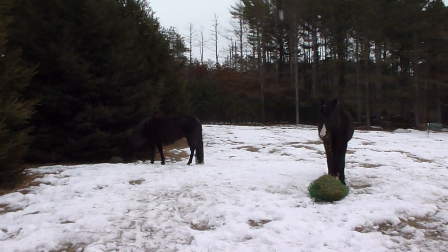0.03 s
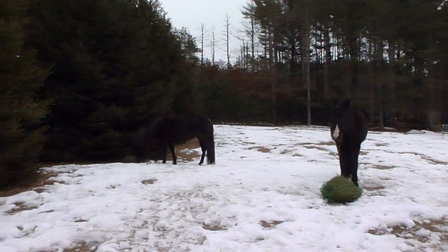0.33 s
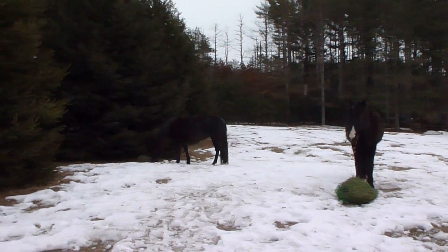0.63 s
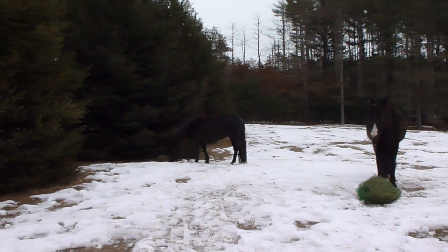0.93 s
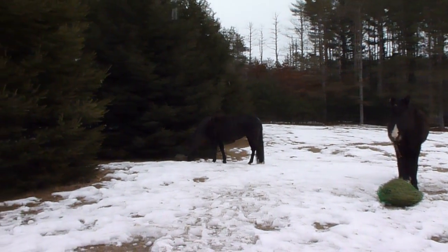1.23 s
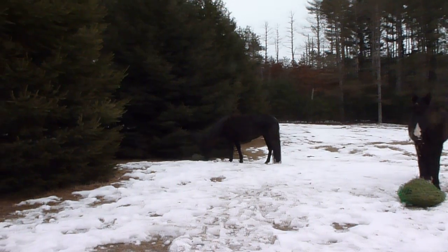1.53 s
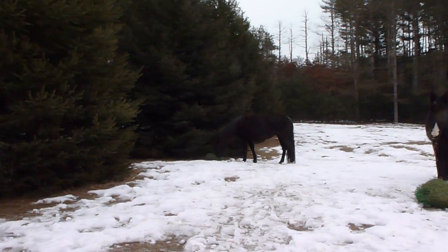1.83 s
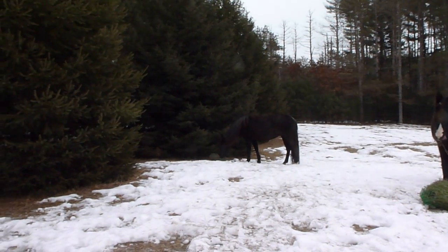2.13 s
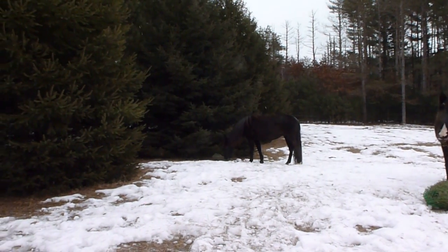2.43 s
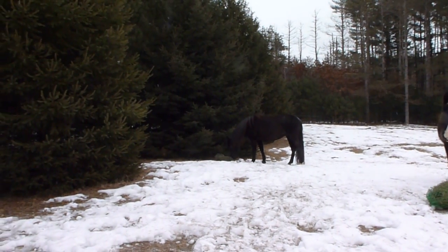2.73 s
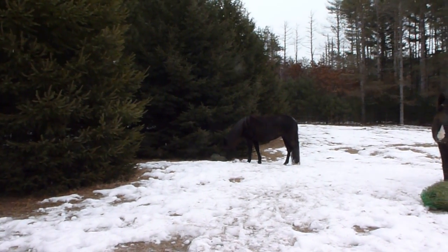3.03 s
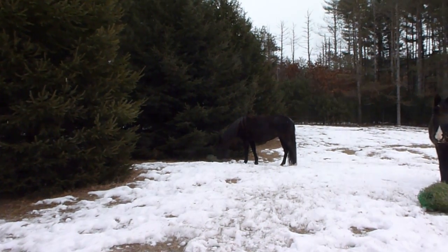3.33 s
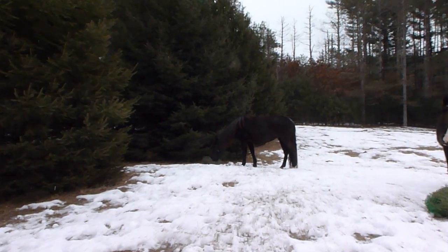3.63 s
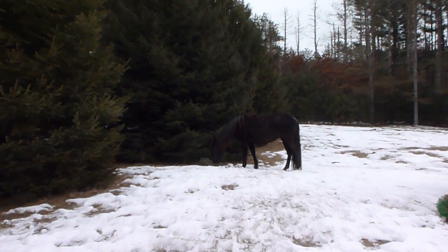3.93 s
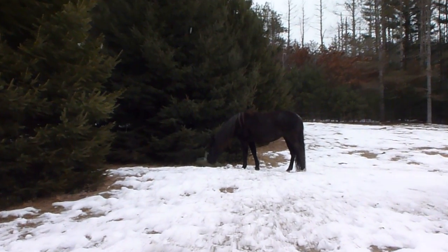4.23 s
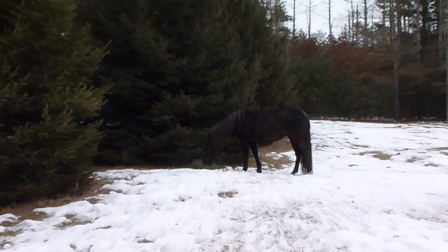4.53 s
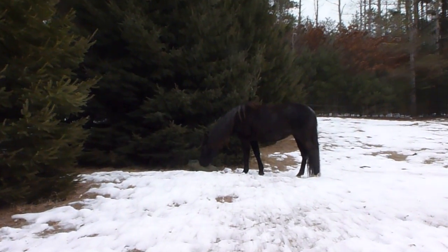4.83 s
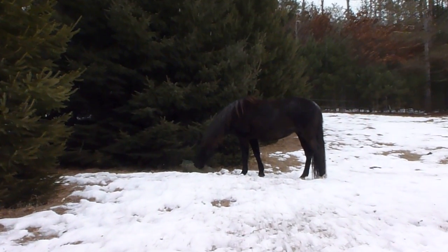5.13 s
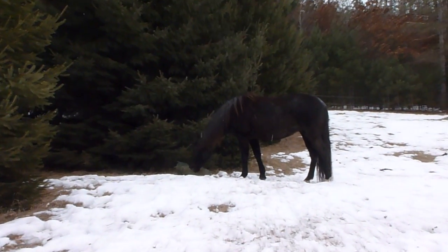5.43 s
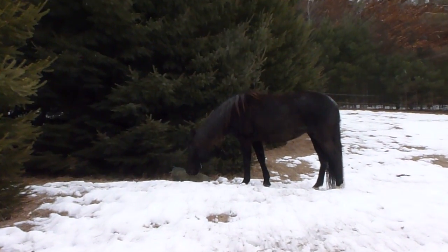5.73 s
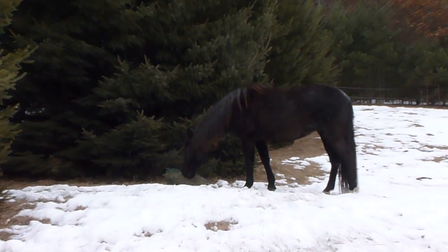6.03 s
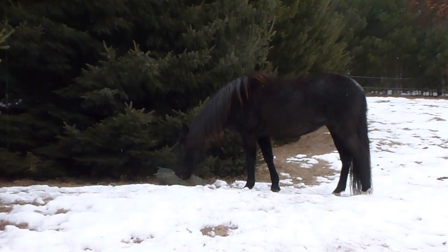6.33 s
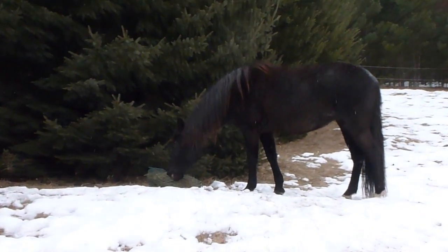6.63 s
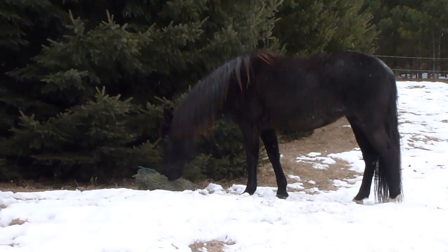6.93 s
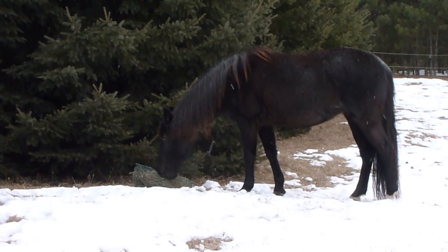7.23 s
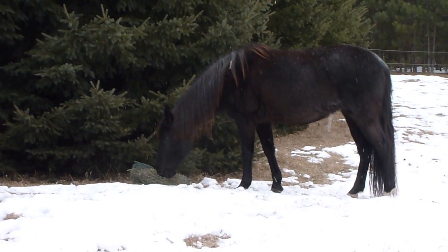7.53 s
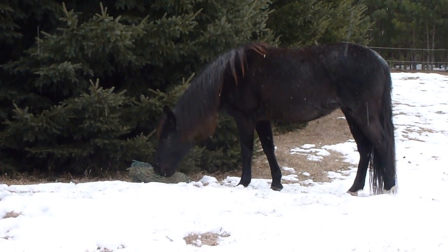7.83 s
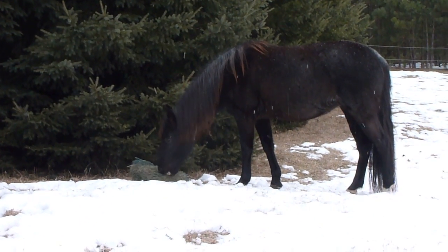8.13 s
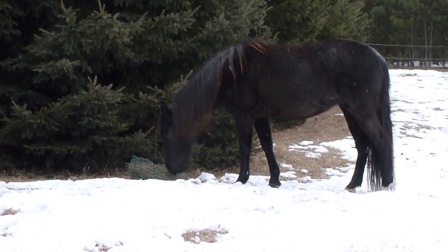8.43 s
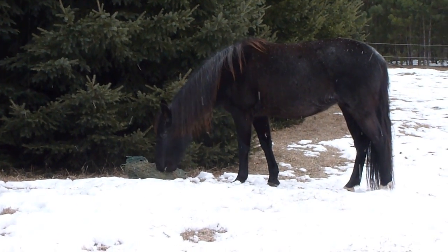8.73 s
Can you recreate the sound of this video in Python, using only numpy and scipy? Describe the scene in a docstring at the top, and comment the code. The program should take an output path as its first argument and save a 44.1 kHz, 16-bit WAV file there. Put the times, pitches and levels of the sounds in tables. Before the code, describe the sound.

Light rain falls on an open snowy field, a soft, steady hiss and fine patter over the low rumble of wind in distant trees. Single drops tick close to the microphone at irregular moments, dry and without echo. About three quarters of the way through, a big drop hits the microphone's plastic housing with a sharp knock. The background dips briefly and returns as more drops tick.

```python
"""Light rain on a snowy field

One microphone stands in open snow edged by conifers; soft wind and faint hums lie far off.
Countless distant drops merge into a hiss that swells with the breeze; nearer ones tick one by one.
A droplet, then a big drop, strike the microphone's housing, and the gain control ducks for a moment."""
import sys
import numpy as np
from scipy import signal
from scipy.fft import rfft, irfft
from scipy.io import wavfile
from scipy.ndimage import uniform_filter1d

SR = 44100
rng = np.random.default_rng(int(sys.argv[2]) if len(sys.argv) > 2 else 0)


def pcm_store(signal):
    """Save signal as 16-bit PCM."""
    levels = np.round(np.clip(np.atleast_2d(signal), -1, 1) * 32767)
    wavfile.write(sys.argv[1], SR, levels.astype(np.int16).T)


N = 392490

# Table levels are relative. Far-off hums: start t/s, end t/s, f/Hz, level/dB
HUMS = [(1.1, 3.6, 337.9, -58.5), (3.0, 4.9, 261, -60), (6.498, 8.003, 98, -57.5), (7.3, 9.4, 133.6, -59)]
# spectrum of the low roar of the far woods: f/Hz, level/dB
ROAR_SPECTRUM = [(20, -29), (40, -15.5), (62, -1), (100, 1), (160, 0), (220, 1.5), (300, -2.5),
                 (400, -17.5), (800, -39)]
# slow swell of that roar: t/s, level/dB
ROAR_SWELL = [(0, -50), (2.2, -49.5), (3.0, -51.3), (4.2, -51.5), (5.45, -47.5), (6.7, -50.5), (8.2, -50),
              (8.9, -51.5)]
# spectrum of the wind rushing in the conifers: f/Hz, level/dB
RUSH_SPECTRUM = [(100, -18), (280, 0), (340, 4), (380, 1), (800, -0.5), (1200, -6.5), (2000, -11.5),
                 (7000, -36)]
# strength of the breeze, which drives the rush, the rain and the drips: t/s, level/dB
BREEZE_LEVEL = [(0, 0), (0.5, 1.22), (2.4, 1.38), (2.7, -1.3), (3.4, 0), (6.5, -0.12), (7.8, -0.5),
                (8.4, 1.3), (8.9, 1.0)]
# spectrum of the distant rain's hiss: f/Hz, level/dB
HISS_SPECTRUM = [(300, -1), (1000, -2.5), (1700, 2), (2700, 6), (3800, 6), (5100, 3.5), (6300, -1),
                 (7000, -13), (8000, -12.5)]
# colour shared by all splashes: f/Hz, level/dB
SPLASH_SPECTRUM = [(80, -5.5), (350, 1), (700, 1.5), (1150, 1), (3600, -2), (5000, 0.5), (6300, -8.5),
                   (7500, -18.5)]
# loudest drops near the microphone: t/s, level/dB, centre f/Hz, spectral width/octaves
NEAR_DROPS = [(0.0553, -5.5, 3630, 2.9), (0.3264, 4, 3500, 0.15), (0.493, 2.5, 3530, 0.84),
              (0.714, -6.5, 5600, 0.22), (1.6896, 8, 2030, 0.29), (1.876, 1, 4270, 0.29),
              (1.8818, 7.5, 2150, 0.64), (2.007, -2, 2220, 0.45), (2.0405, -2, 3500, 0.28),
              (2.0683, -4, 1390, 1.6), (2.1412, -6.5, 1670, 1.05), (3.2209, -4.5, 1790, 0.71),
              (3.5675, -4.5, 3930, 0.32), (3.959, -5.5, 4480, 0.8), (4.0553, -5, 2150, 0.31),
              (4.197, -5, 1390, 0.59), (4.384, 3.5, 3700, 0.55), (5.042, -7, 2410, 1.1),
              (5.2394, 3, 3450, 0.11), (6.0237, -6.5, 1120, 1.9), (6.369, -4, 1950, 0.67),
              (6.4094, -8, 2320, 1.1), (7.019, -4, 3450, 0.43), (7.1412, -5, 1290, 2),
              (7.2671, 0.5, 2300, 0.96), (7.465, -3.5, 3300, 0.37), (7.5992, -4.5, 1000, 1.9),
              (7.9, 0, 1960, 1.16), (7.9706, 4.5, 1870, 1.34), (8.011, 0.5, 1330, 1.1),
              (8.272, 1, 1950, 0.92), (8.3328, -3, 3150, 0.43), (8.5237, -3, 1750, 1.2),
              (8.6221, -3, 2200, 0.45), (8.7736, -2, 2820, 1)]
# drops landing on the microphone's housing: t/s, level/dB
HOUSING_HITS = [(6.76, -22.5), (6.7821, -1.5)]
# modes of the housing: f/Hz, level/dB, t60/s
HOUSING_MODES = [(870, -11.5, 0.0028), (1420, -21.5, 0.046), (1720, -13.5, 0.034), (1986, -7, 0.015),
                 (2750, -9.5, 0.0068), (3720, -13.5, 0.018), (4780, -16.5, 0.0068), (5900, -16.5, 0.0082),
                 (6700, -15, 0.0046)]


def amp(db):
    """Decibels to gain."""
    return 10 ** (np.asarray(db) / 20)


def unit(x):
    """Scales to an rms of one."""
    return x / np.sqrt(np.mean(x ** 2) + 1e-20)


def spectrum_db(points, hz):
    """Reads a spectrum on a log-frequency axis."""
    f, db = np.transpose(points)
    return np.interp(np.log(hz + 1), np.log(f), db)


def follow(curve):
    """Gain at every sample from a level curve."""
    return amp(np.interp(np.arange(N) / SR, *np.transpose(curve)))


def add(mix, start_s, sound):
    """Mixes a sound in at a time."""
    part = mix[max(round(start_s * SR), 0):][:len(sound)]
    part += sound[:len(part)]


def minimum_phase(gain):
    """Shortest response with the given two-sided spectrum: a sharp attack, then a decay."""
    log_spectrum = np.conj(signal.hilbert(np.log(gain)))
    return np.fft.ifft(np.exp(log_spectrum)).real[:len(gain) // 2]


def colour(x, points, size=2048):
    """Filters by a spectrum without blurring attacks."""
    gain = amp(spectrum_db(points, abs(np.fft.fftfreq(size, 1 / SR))))
    return signal.oaconvolve(x, minimum_phase(gain))[:len(x)]


def patchy_noise(points, patchy_db, size, span):
    """Shaped noise whose level drifts in patches, span frames long and span bins wide."""
    hz = np.fft.rfftfreq(size, 1 / SR)
    real, imag, patches = rng.standard_normal((3, 4 * N // size + 5, len(hz)))
    patches = uniform_filter1d(patches, span, axis=0)
    patches = unit(uniform_filter1d(patches, span, axis=1))
    frames = (real + 1j * imag) * amp(spectrum_db(points, hz) + patchy_db * patches)
    _, noise = signal.istft(frames.T, nperseg=size, noverlap=size - size // 4)
    return unit(noise[:N])


def tick(hz, octaves, snap=0.21, thud=0.22, thud_hz=620, spray=0.26, spray_s=0.0011, size=1024):
    """One drop: an impact and a brief spray, coloured by one peak, a flat snap and a soft thud."""
    t, f = np.arange(size // 2) / SR, abs(np.fft.fftfreq(size, 1 / SR)) + 1
    spray_envelope = (1 - np.exp(-t / 0.00013)) * np.exp(-t / spray_s)
    force = spray * rng.standard_normal(len(t)) * spray_envelope
    force[0] = 1  # the impact
    peak = np.exp(-.5 * (np.log2(f / hz) / octaves) ** 2)
    weight = thud * np.exp(-2 * np.log2(f / thud_hz) ** 2)  # the drop's mass pushes on what it hits
    body = minimum_phase(np.hypot(peak, weight) + snap)
    return signal.fftconvolve(force / np.linalg.norm(force), body)[:len(t)]


def far_hums(width_hz=3.3):
    """Distant hums drift in and out, smeared by the moving air into narrow, wavering bands."""
    t, f, out = np.arange(N) / SR, np.fft.rfftfreq(N, 1 / SR), np.zeros(N)
    for start, end, hz, db in HUMS:
        band = np.exp(-.5 * ((f - hz) / width_hz) ** 2)
        hum = irfft(rfft(rng.standard_normal(N)) * band, N)
        fade = np.sin(np.pi * np.clip((t - start) / (end - start), 0, 1))
        out += amp(db) * unit(hum) * fade
    return out


def wind_in_trees(roar_gain_db=0.5, rush_gain_db=-48.0, sway=0.87):
    """The far woods roar low and swell slowly; a rush in the conifers follows the breeze."""
    roar = follow(ROAR_SWELL) * patchy_noise(ROAR_SPECTRUM, patchy_db=0.24, size=4096, span=8)
    rush = follow(BREEZE_LEVEL) ** sway * patchy_noise(RUSH_SPECTRUM, patchy_db=1.0, size=2048, span=8)
    return amp(roar_gain_db) * roar + amp(rush_gain_db) * rush


def patter(per_s=300, spread_db=3.0, octaves=0.61, kinds=32):
    """Drops in the middle distance: many faint, a few stronger, each kind with its own pitch."""
    out = np.zeros(N)
    for hz in np.geomspace(1500, 5500, kinds):
        when, size = rng.random((round(per_s * N / SR / kinds), 2)).T
        strength = np.minimum(-np.log(1 - size), 4)  # exponential spread, capped
        hits = np.zeros(N)
        hits[(when * N).astype(int)] = amp(spread_db * strength)
        out += signal.oaconvolve(hits, unit(tick(hz, octaves)))[:N]
    return unit(colour(out, SPLASH_SPECTRUM))


def field_rain(hiss_db=-50.2, patter_db=-56.5, sway=0.8):
    """Across the field, the far hiss and the nearer patter rise and fall with the breeze."""
    hiss = patchy_noise(HISS_SPECTRUM, patchy_db=1.34, size=512, span=6)
    return follow(BREEZE_LEVEL) ** sway * (amp(hiss_db) * hiss + amp(patter_db) * patter())


def drips(base_per_s=6, gain_db=-12.5, spread_db=2.4, low_hz=1450, high_hz=4660, candidates=240):
    """Faint ticks a few steps away, at random; a rising breeze shakes more of them loose."""
    out = np.zeros(N)
    chance = base_per_s * N / SR / candidates * follow(BREEZE_LEVEL) ** 6
    for when, draw, strength, pitch, width in rng.random((candidates, 5)):
        if draw < chance[int(when * N)]:
            hz = low_hz * (high_hz / low_hz) ** pitch
            db = gain_db + spread_db * (2 * strength - 1)
            add(out, when * N / SR, amp(db) * tick(hz, octaves=0.39 + 0.79 * width))
    return colour(out, SPLASH_SPECTRUM)


def near_drops(gain_db=-1.5):
    """Single ticks close to the microphone, each doubled by a brief spray just after it lands."""
    out = np.zeros(N)
    for start_s, db, hz, octaves in NEAR_DROPS:
        add(out, start_s, amp(db + gain_db) * tick(hz, octaves))
    return colour(out, SPLASH_SPECTRUM)


def housing_knocks(size=2048):
    """A droplet and then a big drop land on the microphone's housing and ring its short plastic modes."""
    t, out = np.arange(size) / SR, np.zeros(N)
    modes = [amp(db - 60 * t / t60) * np.cos(2 * np.pi * hz * t) for hz, db, t60 in HOUSING_MODES]
    ring = sum(modes[::2]) - sum(modes[1::2])  # neighbouring modes swing in opposite directions
    for start_s, db in HOUSING_HITS:
        add(out, start_s, amp(db) * ring)
    return out


def scene():
    """The field in mono, from the far trees in to the microphone itself."""
    background = far_hums() + wind_in_trees() + field_rain()
    close = drips() + near_drops() + housing_knocks()
    return (background + close)[None]


def record(dry, threshold_db=-19, slope=0.38, release_db_per_s=10, cutoff_hz=7450):
    """The recorder's gain control dips after a loud hit and creeps back; a low-pass cuts the top."""
    power = signal.lfilter(np.ones(88) / 88, 1, dry[0] ** 2)  # 2 ms average
    power_db = 10 * np.log10(power + 1e-12)
    release_db = release_db_per_s * np.arange(N) / SR
    held_db = np.maximum.accumulate(power_db + release_db) - release_db  # peaks held, sinking slowly
    over_db = np.maximum(held_db - threshold_db, 0)
    over_db = signal.lfilter([.005], [1, -.995], over_db)  # attack of about 5 ms
    lowpass = signal.firwin(221, cutoff_hz, window=("kaiser", 7), fs=SR)
    return signal.oaconvolve(dry * amp(-slope * over_db), lowpass[None], "same")


dry = scene()
out = record(dry)
pcm_store(out)
```